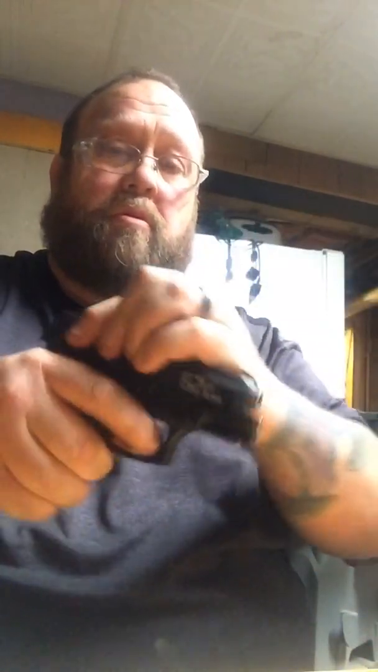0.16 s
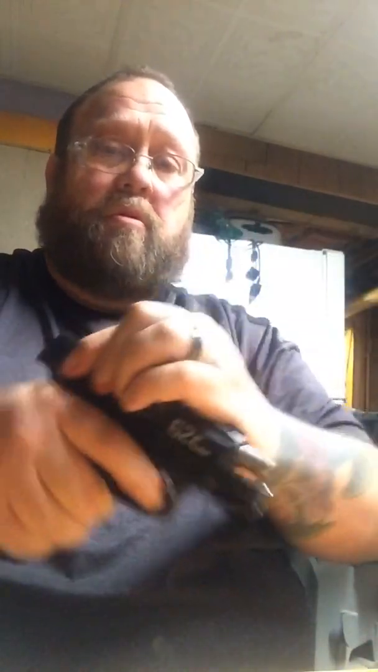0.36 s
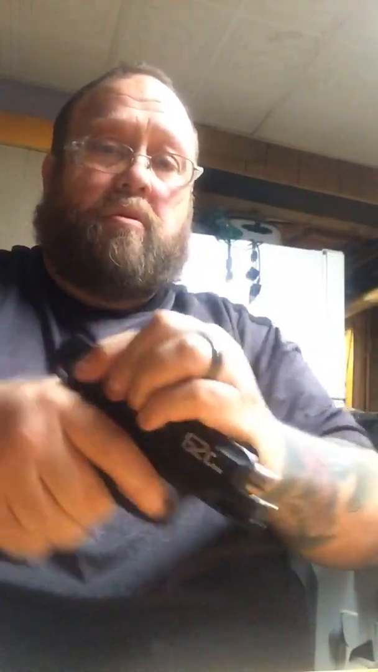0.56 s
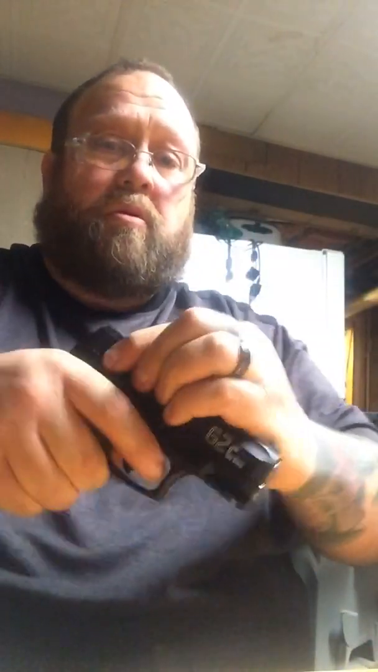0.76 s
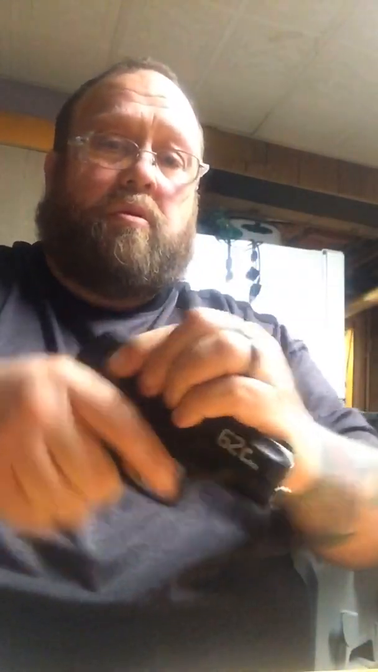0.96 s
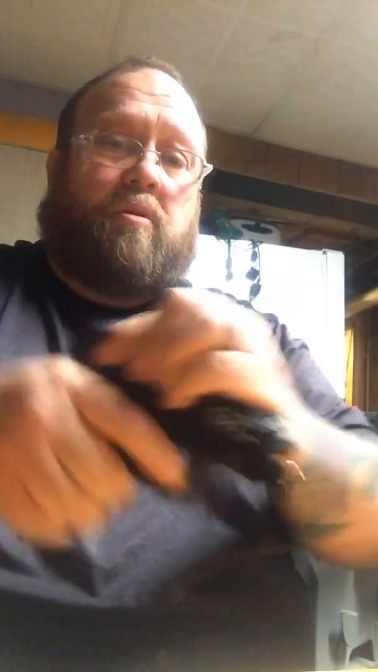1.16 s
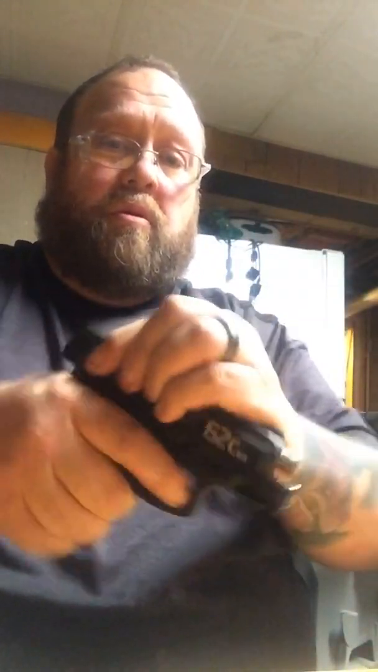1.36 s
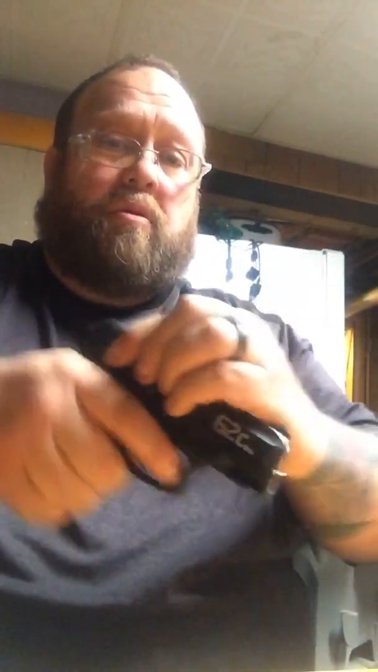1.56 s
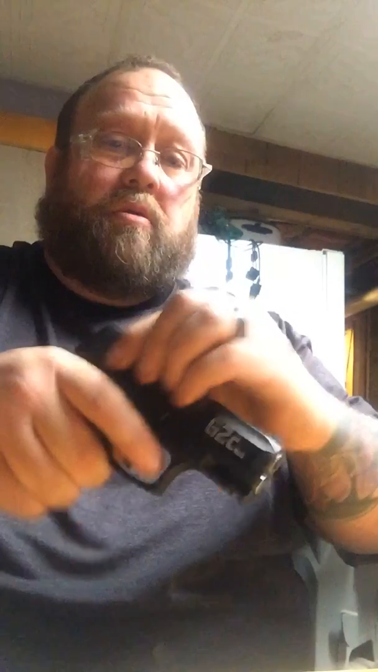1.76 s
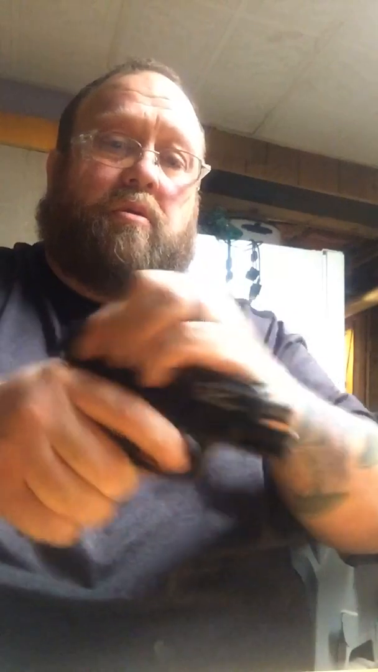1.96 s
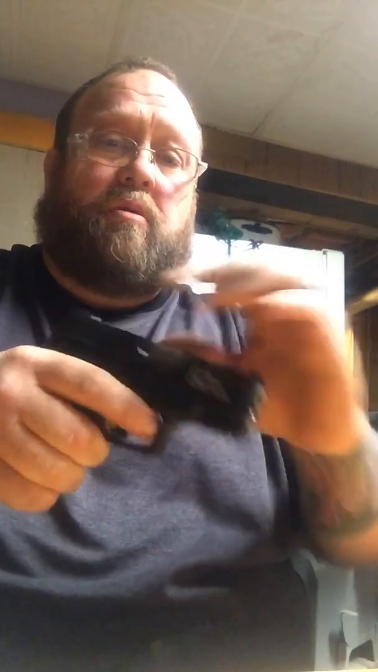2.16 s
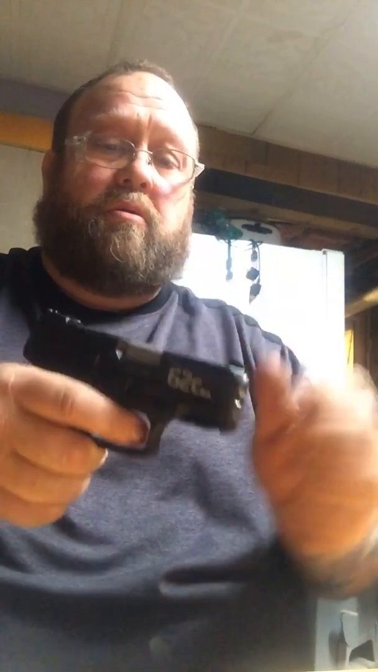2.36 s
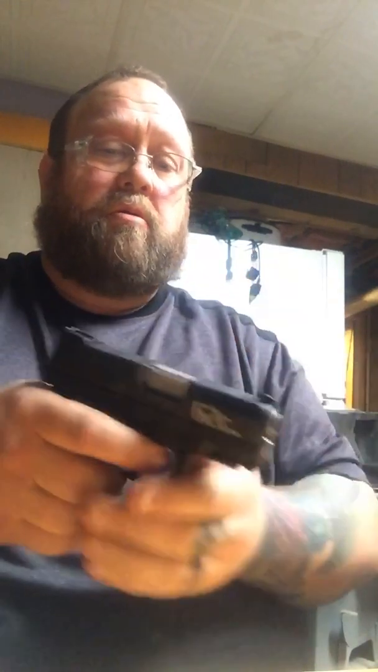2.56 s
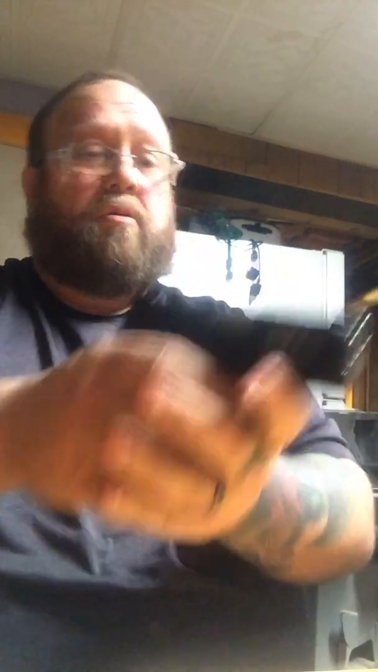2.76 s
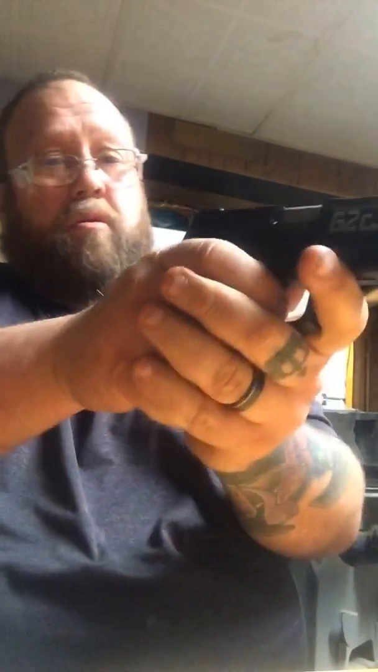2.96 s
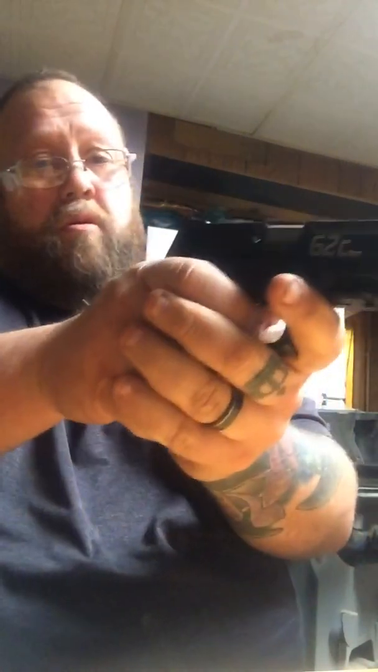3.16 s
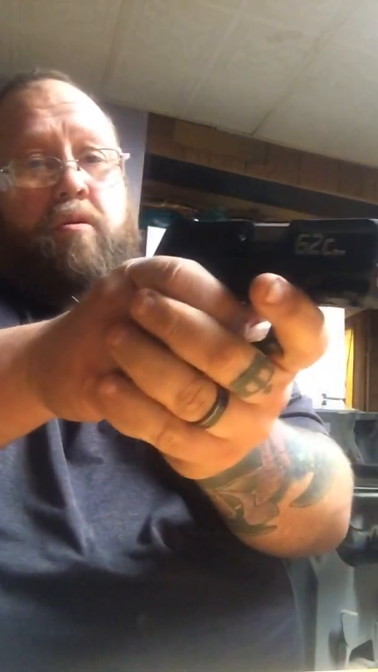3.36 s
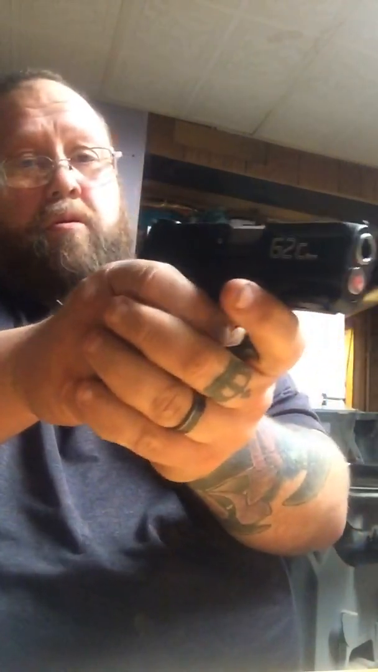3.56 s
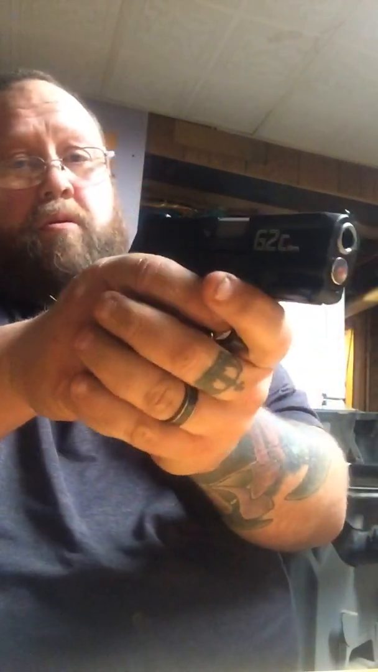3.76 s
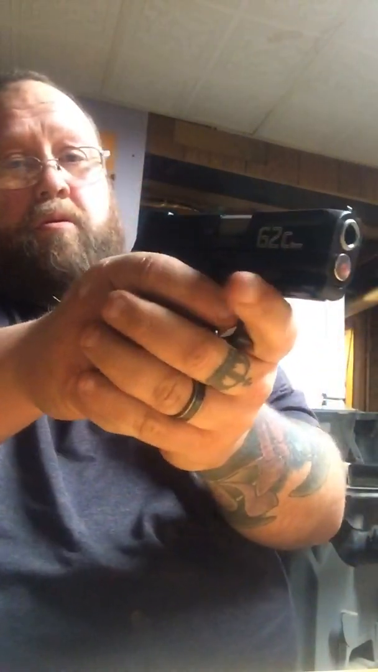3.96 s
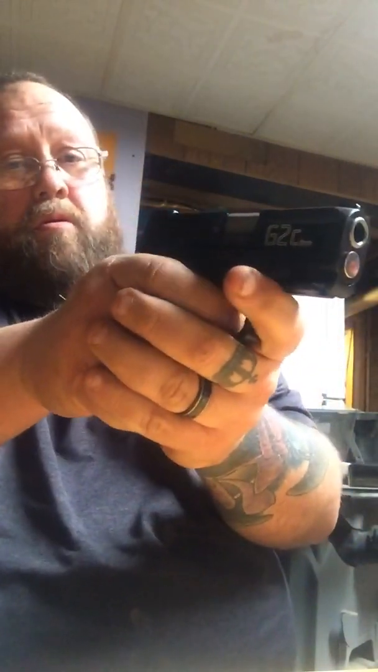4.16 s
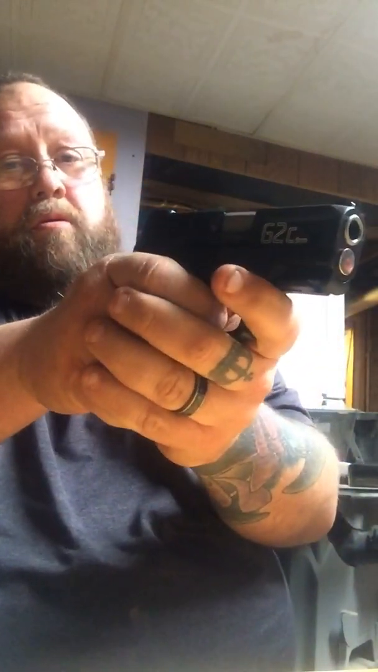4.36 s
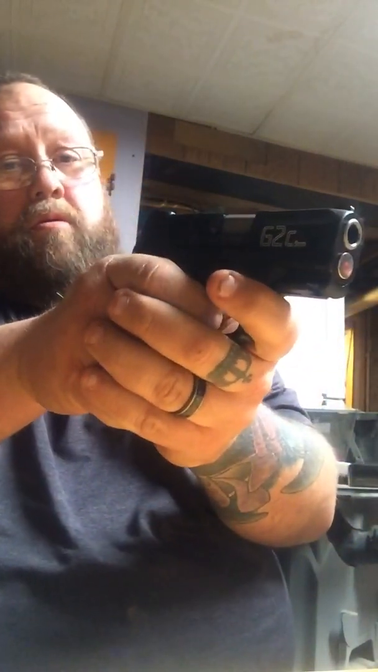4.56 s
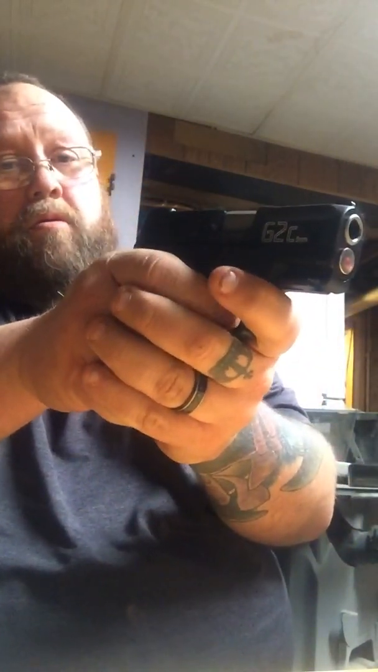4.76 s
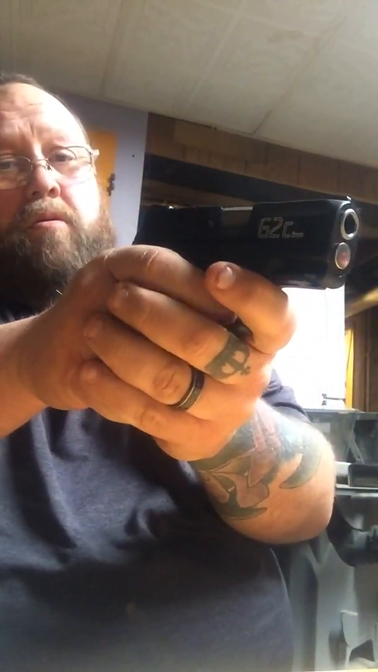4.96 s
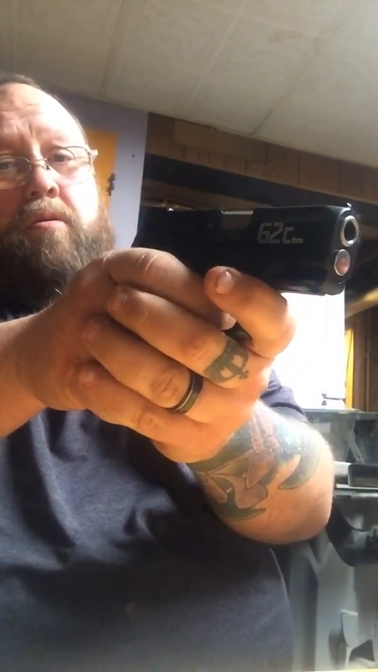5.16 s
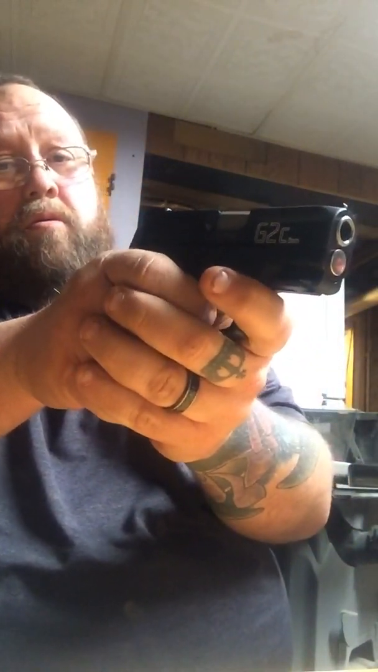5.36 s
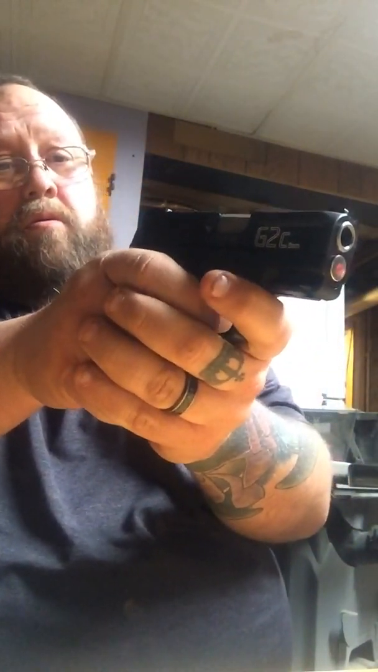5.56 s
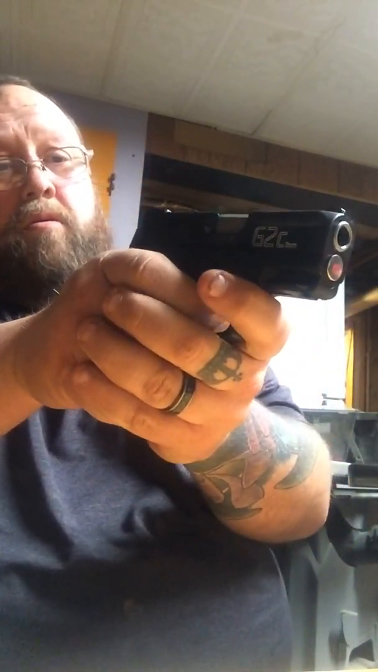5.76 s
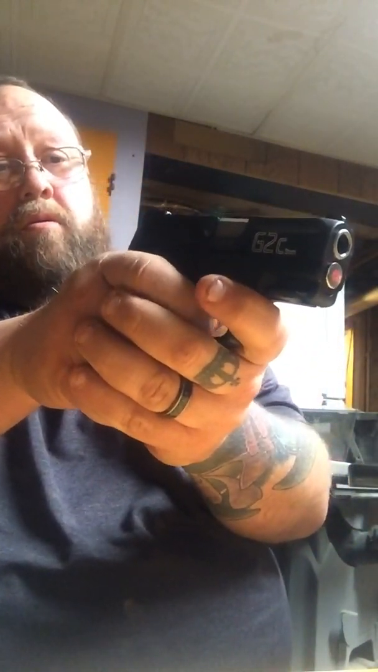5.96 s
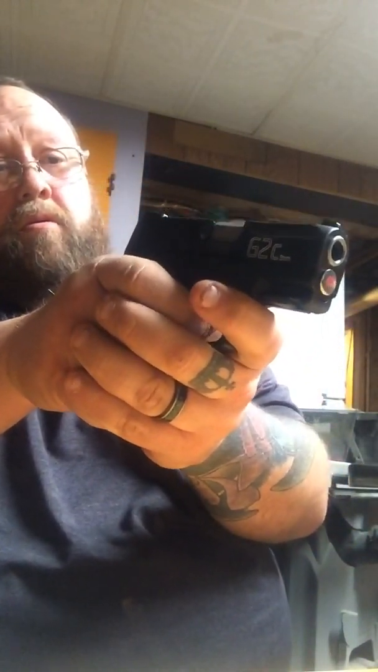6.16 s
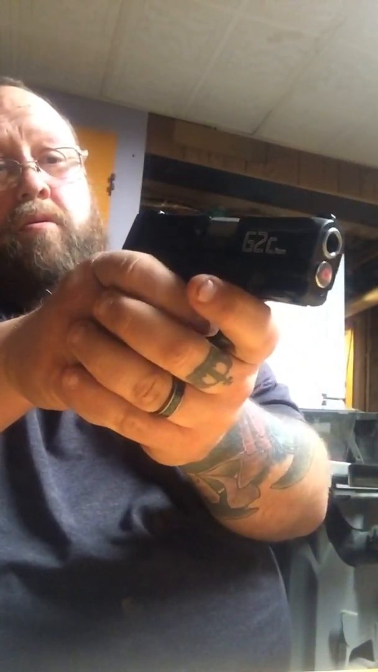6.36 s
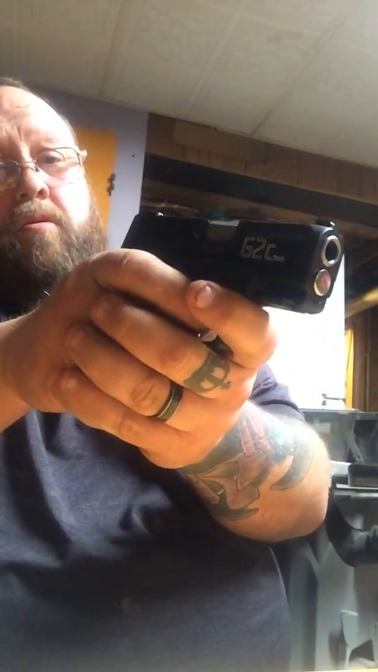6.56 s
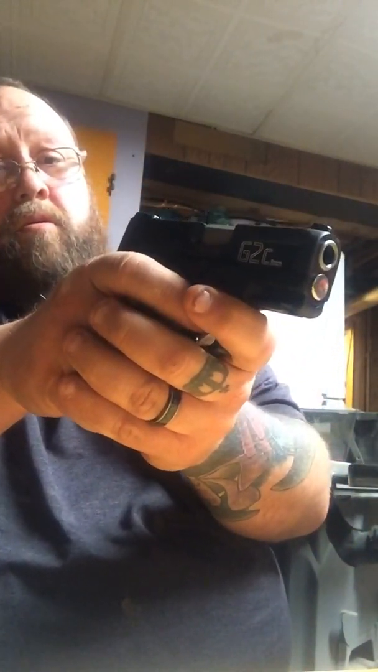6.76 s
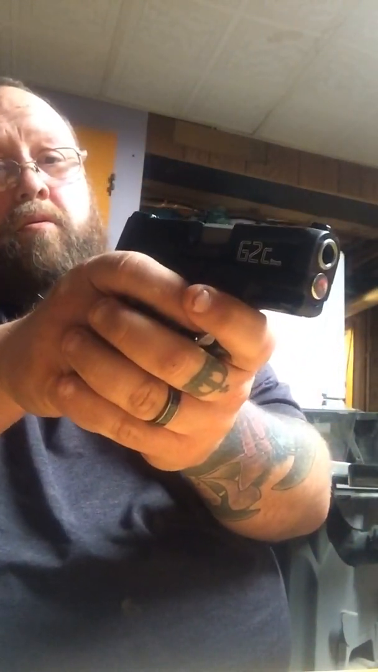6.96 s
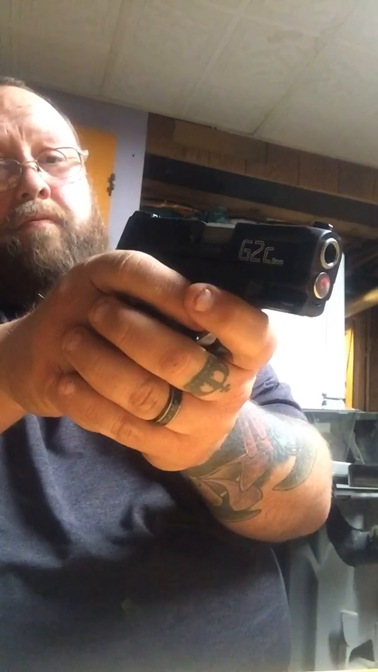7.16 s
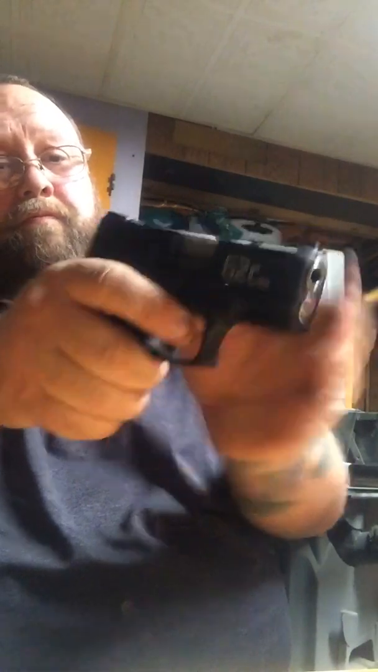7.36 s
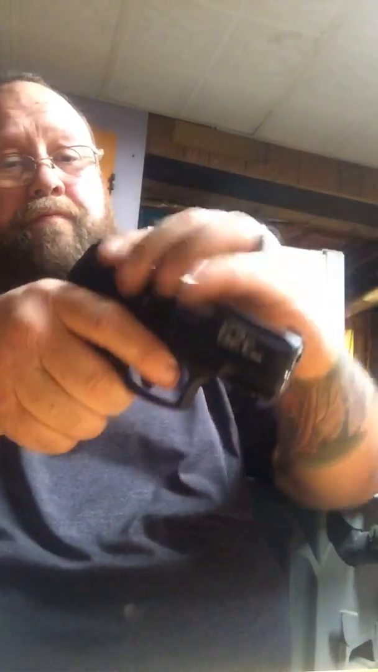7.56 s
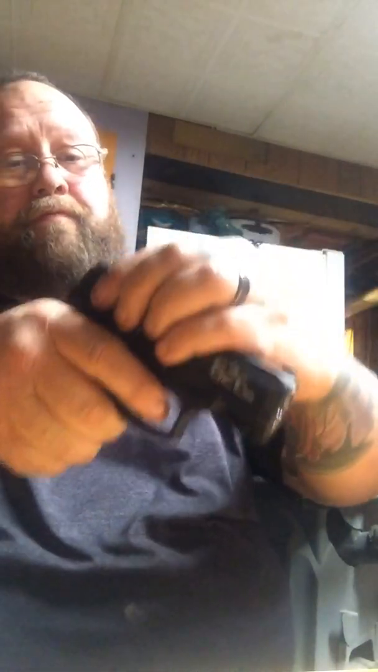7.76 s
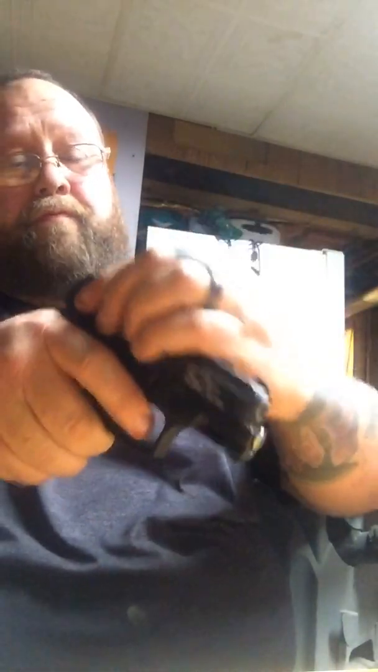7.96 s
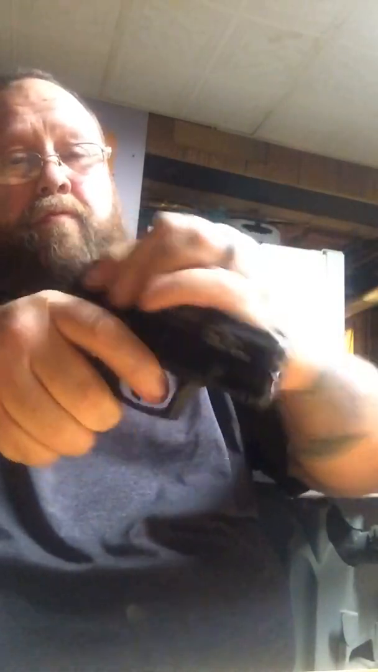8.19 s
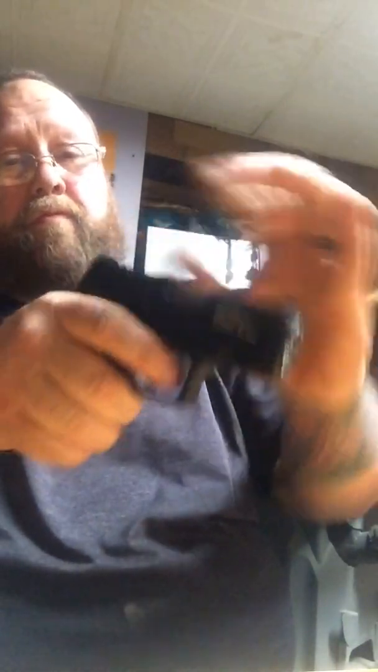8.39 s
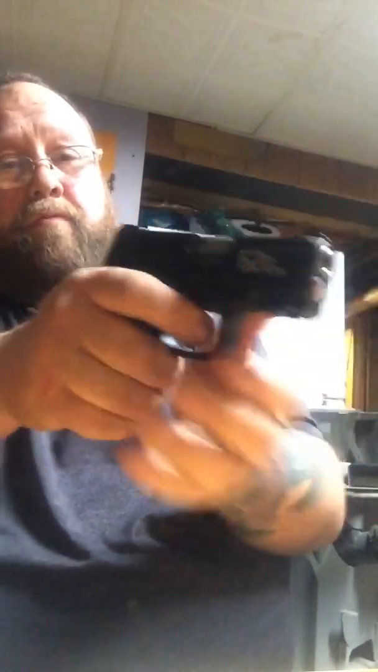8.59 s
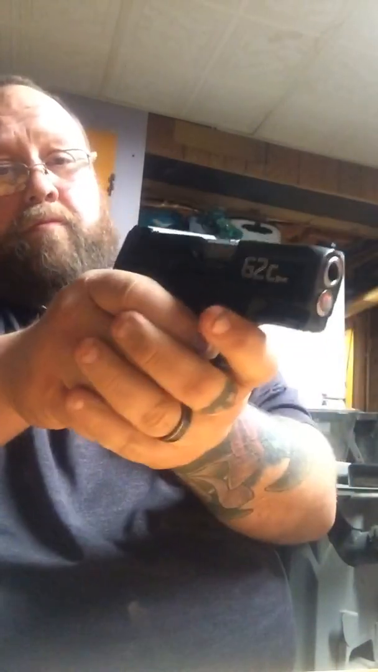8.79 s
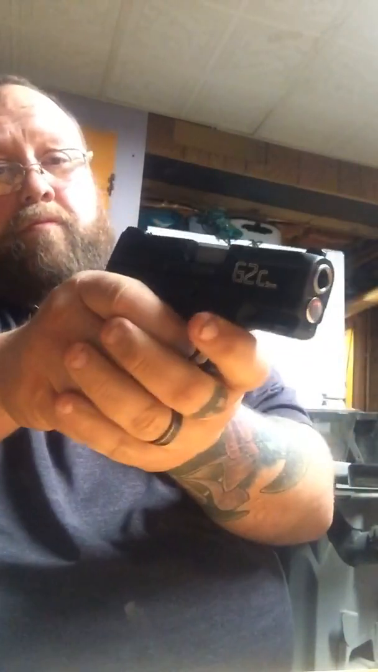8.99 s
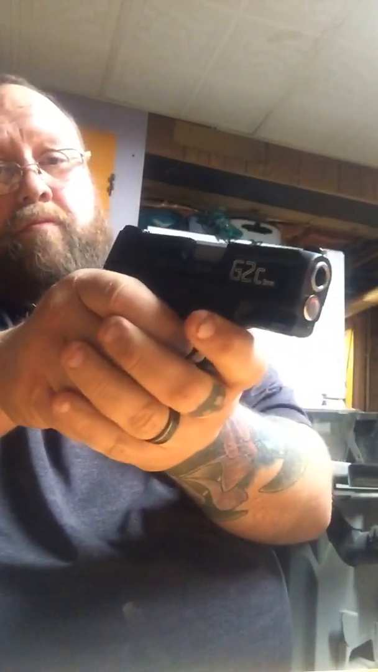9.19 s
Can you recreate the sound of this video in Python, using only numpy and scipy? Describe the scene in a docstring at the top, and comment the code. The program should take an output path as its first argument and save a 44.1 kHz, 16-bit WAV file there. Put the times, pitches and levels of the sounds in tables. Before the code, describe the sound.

Fast metallic clack-clack of a handgun slide, followed by spaced dry striker snaps and tiny ticks, one more rack, over a faint indoor hum.

```python
"""A pistol slide is racked fast by hand, close to the microphone, in a small low room.
The trigger is then pulled and let back: the striker falls with a quick flutter of echoes, trigger parts tick.
One more rack follows. An appliance hums far off over the quiet air of the room.
Contacts are short rough pushes that ring the modes of each part; rubbing is dense random catches.
Hum is a few wavering sines, air is coloured noise, and the room is a tail of decaying noise bands."""
import sys
import numpy as np
from scipy import signal
from scipy.fft import rfft, irfft
from scipy.io import wavfile
from scipy.ndimage import uniform_filter1d

SR = 44100
rng = np.random.default_rng(int(sys.argv[2]) if len(sys.argv) > 2 else 0)


def wrap_up_sound(samples):
    """Save the sound to the file named by the first command line argument, as 16-bit audio."""
    columns = np.atleast_2d(samples).T
    # keep every value between -1 and 1, then stretch to whole-number steps
    tamed = np.clip(columns, -1, 1)
    steps = np.round(tamed * 32767).astype(np.int16)
    wavfile.write(sys.argv[1], SR, steps)


N = 407043   # samples

# Far-off appliance hum. Each row: frequency in Hz, mean level in dB rms.
HUM_LINES = [(120, -66.5), (300, -83), (360, -82.5)]
# Colour of the quiet room air. Each row: frequency in Hz, relative density in dB per Hz.
AIR_SPECTRUM = [(25, -16), (58, -19), (118, -14), (170, -18), (340, -20), (430, -22.5), (720, -25.5),
                (2500, -28.5), (8000, -36), (16000, -41.5)]
AIR_DB = -67   # mean level, rms
# Reflections of the small low room. Each row: frequency in Hz, level in dB, 60 dB decay time in seconds.
ROOM_DECAY = [(304, -29, 0.092), (1078, -3.5, 0.15), (2500, -8.5, 0.21), (4130, -8.5, 0.14),
              (6500, -9.5, 0.14), (9000, -17, .17), (13000, -15.5, 0.23)]
# Skin and cloth brushing as the hands move. Each row: start and end in seconds, level at each in dB.
BRUSH_STROKES = [(2.7, 2.95, -70, -71), (5.2, 5.38, -70.5, -71.5), (6.0, 6.12, -56, -72),
                 (7.38, 7.62, -71, -76), (8.74, 8.80, -64, -67)]

# Dull knocks on something hollow elsewhere in the room.
# Each row: time in seconds, level in dB, treble in dB, contact in ms.
HOLLOW_KNOCKS = [(2.845, -52, 0, 10.0), (4.13, -48, 0, 10.0)]
# Modes of the hollow thing. Each row: frequency in Hz, width in Hz, level in dB.
HOLLOW_MODES = [(414, 40.5, -10), (576, 29, -15.5), (938, 31, 1)]
# The palm slaps the grip. Each row: time in seconds, level in dB, treble in dB, contact in ms.
PALM_SLAPS = [(7.4875, -32, -9, 1.54), (7.494, -43, -7, 26)]
# Modes of the grip. Each row: frequency in Hz, width in Hz, level in dB.
GRIP_MODES = [(376, 71, -14), (838, 100, -8), (2090, 700, 0.5), (4200, 1170, 6.5), (6800, 4700, 1)]
# Narrow tones: rings after some slide blows, a scraping ping, one short bright tick.
# Each row: start in seconds, frequency in Hz, level in dB, 60 dB decay time in seconds.
NARROW_TONES = [(0.612, 4600, -27, 0.21), (1.081, 8600, -33, .2), (1.1, 4650, -26, 0.1),
                (1.575, 9050, -29.5, .15), (1.975, 9000, -25.5, .1), (5.262, 1906, -62, .3),
                (8.131, 5270, -5.5, 0.0078), (8.342, 9100, -37, 0.14)]

# The trigger bar catches as the trigger moves, with a slip just before and a touch after.
# Each row: time in seconds, level in dB, treble in dB, slip in dB, touch in dB (last two against the level).
BAR_CATCHES = [(3.1723, -34.5, -22, -30, -25), (3.7404, -32.5, -5, -20.5, -6), (4.833, -25, -1.5, -7, -5.5),
               (4.9767, -25, -4, -30, -13), (5.0809, -33.5, -16.5, -25, -13), (5.5764, -24, -6, -11.5, -5),
               (5.9305, -28, 0.5, -10, -3.5), (6.5, -24, -1.5, -8.5, -11)]
# The sear resets after a faint drag. Each row: time in seconds, level in dB, treble in dB.
SEAR_RESETS = [(3.2067, -12, -11.5), (3.7685, -13.5, -1), (5.1153, -13.5, -6), (5.6055, -15, -7.5),
               (5.9574, -16, -6.5), (6.5307, -14, -5.5), (9.0598, -12, -19)]
# Faint ticks of loose trigger parts. Each row: time in seconds, level in dB.
LOOSE_TICKS = [(3.724, -46), (4.2545, -63), (4.364, -45), (4.4646, -53.5), (4.936, -56), (5.2164, -49),
               (5.296, -45.5), (5.349, -47), (5.362, -54), (5.544, -54), (5.6825, -46.5), (5.7325, -37),
               (5.7667, -34), (6.0646, -39.5), (6.099, -46), (6.1093, -55), (7.3996, -54), (8.766, -55.5),
               (8.7832, -59), (9.038, -47)]
# Modes of the trigger parts. Each row: frequency in Hz, width in Hz, level in dB.
TRIGGER_MODES = [(1213, 94, -13), (1810, 119, -4.5), (2550, 177, -3), (3275, 130, -9.5), (3683, 510, 1.5),
                 (4430, 169, 0.5), (5500, 1120, 5), (7390, 1300, 3.5), (7550, 113, -19), (8440, 247, 1),
                 (10230, 100, -13.5), (11840, 3400, -3), (16740, 300, 11.5)]
SLIP_MS, SLIP_TREBLE_DB, AFTER_MS, AFTER_TREBLE_DB, CATCH_MS = 11, -17, 7.4, -14.5, 3.0
DRAG_LEAD_MS, DRAG_DB, DRAG_MS, RESET_MS = 7, -26, 10, 5.2
TICK_TREBLE_DB, TICK_MS, SOFT_TICK_MS, TICK_TOP_HZ = -12, 2.9, 4.0, 5500

# Striker falls. Each row: time of the blow in seconds, level in dB, jolt in dB.
STRIKER_FALLS = [(3.5478, 0, -28.5), (4.653, -1, -29), (5.4041, -1, -35.5), (5.7844, -1.5, -31),
                 (6.3235, -1.5, -30.5)]
# Sounds within one fall: trigger creeps thrice, sear lets go, the blow, ring-up, three quick echoes of the blow.
# Each row: time from the blow in ms, level in dB, treble in dB, length in ms.
FALL_SOUNDS = [(-22, -51, -2, 3.0), (-16, -52, -2, 3.0), (-10.5, -52, -2, 3.0), (-3.6, -27, -22, 5.0),
               (0, -3, -18, 2.6), (2.0, -2, -3, 2.6), (7.2, -4, -2, 2.4), (12.4, -10, -2, 2.4),
               (17.8, -18, -5, 3.0)]
# Modes of the striker. Each row: frequency in Hz, width in Hz, level in dB.
STRIKER_MODES = [(354, 100, -23.5), (579, 44, -30.5), (1308, 570, -15), (2020, 200, -6.5), (2410, 110, -6),
                 (2966, 250, 0), (3605, 172, -7), (4220, 131, -6.5), (5220, 430, -1.5), (7150, 745, -2.5),
                 (7860, 220, -4), (9330, 280, 2.5), (11420, 70, -5), (12400, 710, 3.5), (15150, 1100, 0.5)]

# Modes of the slide. Each row: frequency in Hz, width in Hz, level in dB.
SLIDE_MODES = [(1250, 72, -25), (1598, 110, -18), (2594, 300, -4), (3087, 460, 1.5), (3644, 420, 3.5),
               (4622, 210, -8.5), (5350, 600, -8), (6612, 590, -7), (9100, 170, -1), (9767, 300, -7.5),
               (12600, 900, -14.5), (13100, 2700, -7), (14990, 1500, -13)]
# The slide is pulled to its rear stop: barrel unlocks first, a catch comes before the stop, a bounce after.
# Each row: unlock in seconds, its dB, stop in seconds, its dB, catch in ms before, its dB,
# bounce in ms after, its dB, rubbing in dB, time held back in ms, jolt in dB.
SLIDE_PULLS = [(0.1213, -19, 0.1758, -4, 5.5, -2.5, 23.6, -11.5, -37.5, 60, -54),
               (0.427, -12, 0.4466, 0, 10.7, -5, 27, -15, -30, 79, -55),
               (0.6859, -24, 0.7009, 0.5, 5.6, -8.5, 27, -31, -31.5, 63, -39.5),
               (0.9172, -12, 0.9454, 0, 7.3, -7, 17, -15.5, -34.5, 68, -64),
               (1.18, -28.5, 1.1973, 0.5, 10.8, -6, 23, -23.5, -30.5, 62, -49.5),
               (1.434, -18.5, 1.4526, 0.5, 6.4, -13, 18, -10, -39, 66, -42),
               (1.6915, -23.5, 1.7083, 2, 9.3, -2.5, 23, -16, -25, 42, -74),
               (1.9549, -3, 1.9734, 1, 4.7, -1.5, 31, -36.5, -28.5, 61, -40.5),
               (8.0308, -9, 8.1322, 0, 3.2, -16, 20, -23, -36, 76, -48)]
# The spring drives it home: it locks just before the blow and bounces after.
# Each row: let go in seconds, blow in seconds, its dB, lock in ms before, its dB,
# bounce in ms after, its dB, rubbing in dB, jolt in dB.
SLIDE_SLAMS = [(0.281, 0.319, -1, 24, -16, 19.3, -3.5, -31.5, -51),
               (0.554, 0.5986, 8.5, 4.3, -4.5, 16.5, -8.5, -27, -35.5),
               (0.803, 0.8476, 7.5, 6.4, -1, 13.5, -6, -23.5, -28.5),
               (1.042, 1.0824, 6.5, 8.2, -2, 19, -4, -27.5, -32),
               (1.293, 1.336, 7, 5, 2.5, 9.1, -5, -21.5, -27),
               (1.543, 1.5716, 4.5, 5.6, -5, 15.7, -7.5, -23.5, -56),
               (1.804, 1.8387, 5, 9.4, -6.5, 13, -18.5, -26.5, -47.5),
               (2.059, 2.116, 4.5, 4.2, -0.5, 17, -14, -26, -50),
               (8.28, 8.3398, 6.5, 6.3, -1.5, 12, -20, -24.5, -38.5)]
# Loose slide parts knocking between the stops. Each row: time in seconds, level in dB.
SLIDE_RATTLES = [(0.234, -26), (0.2783, -13.5), (0.311, -24), (0.3333, -12.5), (0.4994, -27), (0.5259, -19),
                 (0.7622, -17), (0.9799, -14), (1.094, -14), (1.2242, -23.5), (1.349, -4.5), (1.4776, -17),
                 (1.4842, -23), (1.5775, -1), (1.5903, -11.5), (1.7355, -7.5), (1.8066, -14.5),
                 (2.0255, -26), (2.108, -4), (8.0608, -23), (8.0775, -8.5), (8.0905, -13.5), (8.12, -16.5),
                 (8.1541, -18), (8.1644, -13.5), (8.1916, -10), (8.203, -6.5)]
STOP_MS, BLOW_MS, TOUCH_MS = 2.3, 6.0, 2.0   # contact lengths
SWELL_MS, SWELL_DB = 2.0, -7   # each blow starts with a softer touch
CHATTER_DB, CHATTER_MS = -24, 40   # loose parts touch by chance after each stop
# rubbing grows towards each stop and goes on while held
PULL_RISE_DB, HELD_DB, HELD_FALL_DB, RUN_UP_DB = 7, -0.5, 5, 14.5
PULL_TREBLE_DB, HELD_TREBLE_DB, RUN_TREBLE_DB = -20, -15, -13.5   # treble of the rubbing
SOFT_TREBLE_DB, TREBLE_AT_0_DB, TREBLE_PER_DB = -17, -10, 2.26   # harder contacts are brighter
RUB_FROM_HZ = 830

STOP_JOLT_HZ, BLOW_JOLT_HZ, FALL_JOLT_HZ = 200, 120, 147.2
TREBLE_FROM_HZ = 7400
CUTOFF_HZ = 16300


def from_db(db):
    """Decibels to amplitude."""
    return 10 ** (np.asarray(db) / 20)


def rms_one(x):
    """Scales to an rms of 1."""
    return x / np.sqrt(np.mean(x ** 2) + 1e-20)


def at_hz(points, hz):
    """Reads each column of a spectrum table on a log-frequency axis."""
    f, *columns = np.transpose(points)
    return [np.interp(np.log(hz), np.log(f), c) for c in columns]


def drift(rate_hz):
    """Slow chance of spread 1, drawn every 40 samples and joined by lines."""
    r = np.exp(-80 * np.pi * rate_hz / SR)
    noise = rng.standard_normal(N // 40 + 2002)
    slow = signal.lfilter([1], [1, -2 * r, r * r], noise)[2000:]
    return np.interp(np.arange(N) / 40, np.arange(len(slow)), rms_one(slow))


def thin(x, hz):
    """Small parts radiate no bass."""
    return signal.sosfilt(signal.butter(2, hz, "high", fs=SR, output="sos"), x)


def stroke_gain(rows, fade_ms):
    """Level ramps in dB over each stroke, softened at the ends."""
    gain = np.zeros(N)
    for start, end, start_db, end_db, *_ in rows:
        i, j = round(start * SR), round(end * SR)
        gain[i:j] += from_db(np.linspace(start_db, end_db, j - i))
    return uniform_filter1d(gain, size=max(int(fade_ms * SR / 1000), 1))


def resonate(x, hz, width_hz):
    """Two-pole resonance; a unit click rings at about height 1."""
    r, w = np.exp(-np.pi * width_hz / SR), 2 * np.pi * hz / SR
    return signal.lfilter([0, np.sin(w)], [1, -2 * r * np.cos(w), r * r], x + 1e-18)


def push(rough, ms):
    """A short rough push whose spectrum is evened, so that it favours no mode; energy 1."""
    age = np.arange(len(rough)) / SR * 1000 / max(ms - .8, .15)
    shape = np.sqrt(age + 0.0037) * np.exp(-2.6 * age)
    x = rough * shape
    for _ in range(3):
        spectrum = rfft(x)
        x = irfft(spectrum / (np.abs(spectrum) + 1e-9)) * np.sqrt(shape)
    return x / np.sqrt(np.sum(x ** 2))


def struck(hits, modes, gain_db, spread_db, crack_db, blur=2.74):
    """Each contact excites every mode with a strength of its own and cracks broadly.
    Row 0 is what reaches the microphone directly, row 1 the evener sound sent all round the room,
    where each mode spreads over blur times its width."""
    hits = np.array(hits)
    force, crack, owner = np.zeros(N), np.zeros(N), np.zeros(N, int)
    rough = rng.standard_normal((len(hits), 2, 1024))
    chance = rng.standard_normal((len(hits), len(modes)))
    for k, (s, level_db, treble_db, ms) in enumerate(hits):
        i = round(s * SR)
        force[i:i + 1024] += from_db(level_db) * push(rough[k, 0], ms)
        crack[i:i + 1024] += from_db(level_db + gain_db + crack_db) * push(rough[k, 1], ms)
        owner[i:] = k   # the latest contact sets the mode strengths
    # countless weak modes blur into a crack, whose treble follows each contact's treble setting
    dull = signal.sosfilt(signal.butter(3, TREBLE_FROM_HZ, fs=SR, output="sos"), crack)
    bright = from_db(8.5) * thin(crack * from_db(hits[:, 2])[owner], TREBLE_FROM_HZ)
    out = np.array([dull + bright, dull + bright])
    for m, (hz, width_hz, db) in enumerate(modes):
        mean_db = db + gain_db + hits[:, 2] * (hz > TREBLE_FROM_HZ)
        sign = (-1) ** m
        drive = sign * force * from_db(mean_db + spread_db * chance[:, m])[owner]
        even = sign * force * from_db(mean_db)[owner]
        out[0] += resonate(drive, hz, width_hz)
        out[1] += np.sqrt(blur) * resonate(even, hz, blur * width_hz)
    return out


def background():
    """Hum lines of a far-off appliance waver in level, over coloured air noise that wavers slightly."""
    t = np.arange(N) / SR
    hum = np.zeros(N)
    for line_hz, db in HUM_LINES:
        tone = np.sin(2 * np.pi * (line_hz * t + rng.random()))
        hum += np.sqrt(2) * from_db(db + 0.66 * drift(4.9)) * tone
    hz = np.maximum(np.fft.rfftfreq(N, 1 / SR), 1)
    air = irfft(rfft(rng.standard_normal(N)) * from_db(at_hz(AIR_SPECTRUM, hz)[0]), N)
    return hum + from_db(AIR_DB + 1.0 * drift(2.2)) * rms_one(air)


def room(x, first_ms=0.43):
    """Dense reflections: quarter-octave bands of noise, each dying at its own rate, after a first delay."""
    t = np.arange(SR // 2) / SR
    edges = 150 * 2 ** np.arange(0, 7, .25)
    tail = np.zeros(len(t))
    for low, high in zip(edges, edges[1:]):
        db, t60 = at_hz(ROOM_DECAY, np.sqrt(low * high))
        band = signal.butter(1, [low, high], "band", fs=SR, output="sos")
        noise = signal.sosfilt(band, rng.standard_normal(len(t)))
        # longer decays start lower, so that the decay time does not change the energy
        tail += noise * from_db(db - 60 * t / t60) / np.sqrt(t60 * SR / (2 * np.log(1000)))
    tail *= np.clip(t * 1000 / first_ms - 1, 0, 1)
    return signal.fftconvolve(x, tail)[:N]


def hollow_knocks():
    """Long soft contacts ring a few low modes with hardly any crack."""
    return struck(HOLLOW_KNOCKS, HOLLOW_MODES, gain_db=2.5, spread_db=-3.0, crack_db=-40)


def brushing():
    """Skin and cloth make soft bright noise."""
    band = signal.butter(1, [2500, 5500], "band", fs=SR, output="sos")
    return stroke_gain(BRUSH_STROKES, fade_ms=30) * rms_one(signal.sosfilt(band, rng.standard_normal(N)))


def palm_slaps():
    """The palm excites the broad, quickly dying modes of the grip."""
    return struck(PALM_SLAPS, GRIP_MODES, gain_db=3, spread_db=1.5, crack_db=-6)


def jolts():
    """A soft push through the hands at each stop, blow and fall rings briefly low, with a thud of the frame."""
    out = np.zeros(N)
    t = np.arange(SR // 10) / SR
    pushes = [(row[2], row[-1], STOP_JOLT_HZ) for row in SLIDE_PULLS]
    pushes += [(row[1], row[-1], BLOW_JOLT_HZ) for row in SLIDE_SLAMS]
    pushes += [(s, jolt_db, FALL_JOLT_HZ) for s, db, jolt_db in STRIKER_FALLS]
    thud = np.sin(2 * np.pi * 380 * t) * np.exp(-t * 150)
    for s, level_db, hz in pushes:
        i = round(s * SR)
        low = np.sin(2 * np.pi * hz * t) * np.exp(-1.4 * t * hz)
        out[i:i + len(t)] += from_db(level_db) * low + from_db(level_db - 3.0) * thud
    return out


def narrow_tones():
    """Single resonances, each set off by one click, die away and waver in level."""
    out = np.zeros(N)
    for s, hz, db, t60 in NARROW_TONES:
        click = from_db(db) * (np.arange(N) == round(s * SR))
        out += resonate(click, hz, np.log(1000) / np.pi / t60)
    return out * from_db(5 * drift(50))


def trigger():
    """Small parts touch briefly; catches and resets each repeat one run of contacts; faint ticks crack less."""
    hits = []
    for s, db, treble_db, slip_db, touch_db in BAR_CATCHES:
        hits += [(s - SLIP_MS / 1000, db + slip_db, SLIP_TREBLE_DB, TICK_MS),
                 (s, db, treble_db, CATCH_MS),
                 (s + AFTER_MS / 1000, db + touch_db, AFTER_TREBLE_DB, CATCH_MS)]
    for s, db, treble_db in SEAR_RESETS:
        hits += [(s - DRAG_LEAD_MS / 1000, db + DRAG_DB, SLIP_TREBLE_DB, DRAG_MS),
                 (s, db, treble_db, RESET_MS)]
    moves = struck(sorted(hits), TRIGGER_MODES, gain_db=0.5, spread_db=4.0, crack_db=4.5, blur=4.04)
    tick_hits = [(s, db, TICK_TREBLE_DB, SOFT_TICK_MS) for s, db in LOOSE_TICKS]
    ticks = struck(tick_hits, TRIGGER_MODES, gain_db=4.5, spread_db=4.0, crack_db=-8.0)
    dull = signal.butter(2, TICK_TOP_HZ, fs=SR, output="sos")
    return thin(moves + signal.sosfilt(dull, ticks), 1300)


def striker():
    """Every fall repeats the same run of sounds, each shifted a little by chance."""
    shifts_ms = rng.normal(0, .25, (len(STRIKER_FALLS), len(FALL_SOUNDS)))
    hits = []
    for k, (s, fall_db, jolt_db) in enumerate(STRIKER_FALLS):
        for c, (ms, db, treble_db, length_ms) in enumerate(FALL_SOUNDS):
            hits.append((s + (ms + shifts_ms[k, c]) / 1000, fall_db + db, treble_db, length_ms))
    return thin(struck(hits, STRIKER_MODES, gain_db=0.0, spread_db=2.5, crack_db=-4.5), 450)


def strokes():
    """Rubbing on the rails: (start s, end s, dB at start, dB at end, treble dB against that level)."""
    rows = [(go, s, rub_db - RUN_UP_DB, rub_db, RUN_TREBLE_DB) for go, s, *_, rub_db, jolt_db in SLIDE_SLAMS]
    for unlock, unlock_db, s, *_, rub_db, held_ms, jolt_db in SLIDE_PULLS:
        held_db = rub_db + HELD_DB
        rows += [(unlock - .005, s, rub_db - PULL_RISE_DB, rub_db, PULL_TREBLE_DB),
                 (s, s + held_ms / 1000, held_db, held_db - HELD_FALL_DB, HELD_TREBLE_DB)]
    return rows


def rails():
    """Dense uneven catches of steel on steel ring the slide over a hiss."""
    sizes = from_db(3.5 * np.minimum(rng.exponential(1, N), 5)) * rng.choice([-1, 1], N)
    caught = rng.random(N) < 8000 / SR   # about 8000 catches a second
    grit = sizes * caught * from_db(3 * drift(80))
    body, treble = np.zeros(N), np.zeros(N)
    for m, (hz, width_hz, db) in enumerate(SLIDE_MODES):
        ring = (-1) ** m * from_db(db + 2.5 * drift(12)) * resonate(grit, hz, 1.6 * width_hz)
        if hz > TREBLE_FROM_HZ:
            treble += ring
        else:
            body += ring
    body = rms_one(thin(body, RUB_FROM_HZ))
    hiss = rms_one(np.diff(grit, prepend=0))
    treble = rms_one(treble) + from_db(0.5) * hiss
    rows = strokes()
    treble_rows = [(a, b, start_db + up, end_db + up) for a, b, start_db, end_db, up in rows]
    return stroke_gain(rows, fade_ms=4.9) * body + stroke_gain(treble_rows, fade_ms=8) * treble


def slide_hits():
    """Contacts of every pull and slam, rattles and chance chatter: (s, level dB, treble dB, contact ms)."""
    hits = [(s, db, TOUCH_MS) for s, db in SLIDE_RATTLES]
    for unlock, unlock_db, s, db, early_ms, catch_db, late_ms, bounce_db, *_ in SLIDE_PULLS:
        hits += [(unlock, unlock_db, TOUCH_MS),
                 (s - early_ms / 1000, catch_db, TOUCH_MS),
                 (s, db, STOP_MS),
                 (s + late_ms / 1000, bounce_db, TOUCH_MS)]
    for go, s, db, early_ms, lock_db, late_ms, bounce_db, *_ in SLIDE_SLAMS:
        hits += [(s - early_ms / 1000, lock_db, TOUCH_MS),
                 (s - SWELL_MS / 1000, db + SWELL_DB, BLOW_MS),
                 (s, db, BLOW_MS),
                 (s + late_ms / 1000, bounce_db, TOUCH_MS)]
    stops = [row[2] for row in SLIDE_PULLS] + [row[1] for row in SLIDE_SLAMS]
    for s, draws in zip(stops, rng.random((len(stops), 2, 2))):
        for when, weak in draws:
            hits.append((s + (5 + CHATTER_MS * when) / 1000, CHATTER_DB - 10 * weak, TOUCH_MS))

    def treble(db):
        return np.clip(TREBLE_AT_0_DB + TREBLE_PER_DB * db, SOFT_TREBLE_DB, 0)
    return sorted((s, db, treble(db), ms) for s, db, ms in hits)


def slide():
    """Hard contacts ring the modes of the slide, with its rubbing on the rails between them."""
    blows = struck(slide_hits(), SLIDE_MODES, gain_db=-3.5, spread_db=4.0, crack_db=-1.0, blur=2.2)
    return thin(blows + rails(), 1300)


def scene():
    """Direct sound at the microphone, the reflections of the room, and the background."""
    soft = brushing() + thin(hollow_knocks() + palm_slaps(), 248) + jolts() + narrow_tones()
    direct, all_round = soft + trigger() + striker() + slide()
    return (background() + room(all_round) + direct)[None]


def record(dry):
    """The loudest hits overload; the deepest bass and the top are cut."""
    clipped = .86 * dry / (.86 ** 8 + np.abs(dry) ** 8) ** (1 / 8)
    return signal.sosfilt(signal.cheby2(14, 60, CUTOFF_HZ, fs=SR, output="sos"), thin(clipped, 45))


dry = scene()
out = record(dry)
wrap_up_sound(out)
```